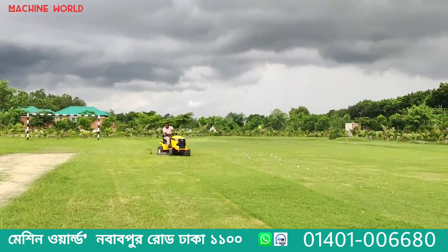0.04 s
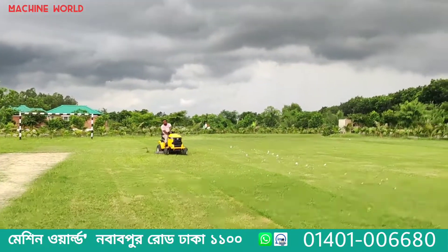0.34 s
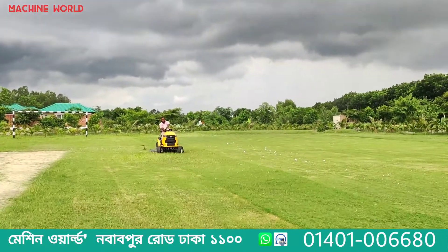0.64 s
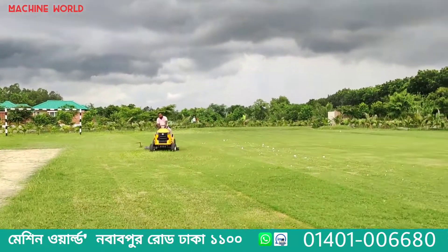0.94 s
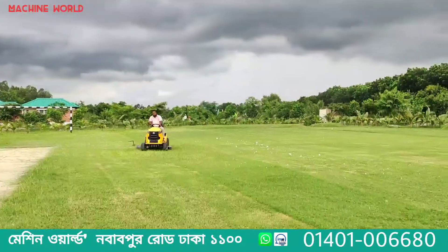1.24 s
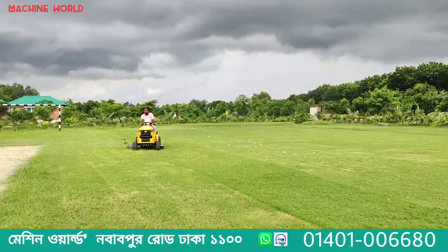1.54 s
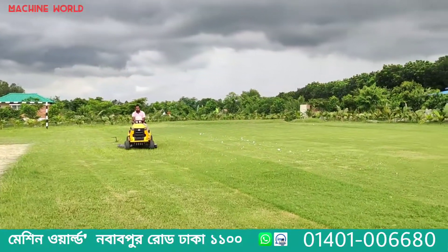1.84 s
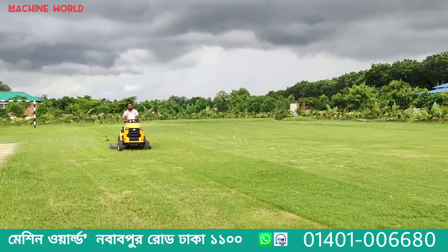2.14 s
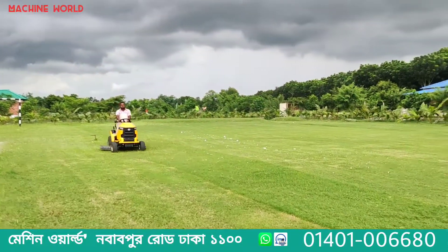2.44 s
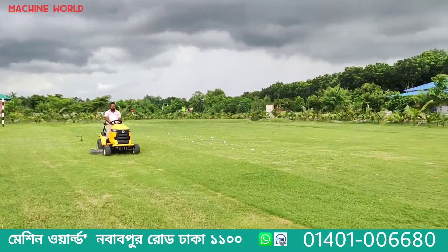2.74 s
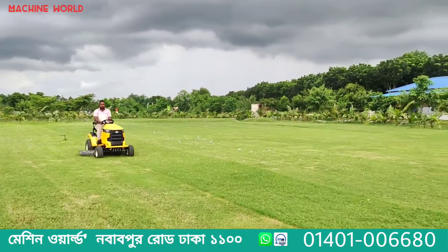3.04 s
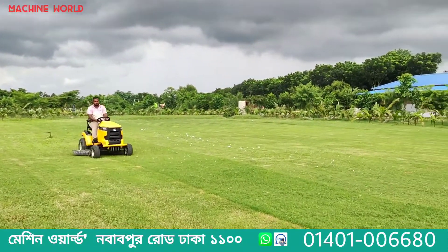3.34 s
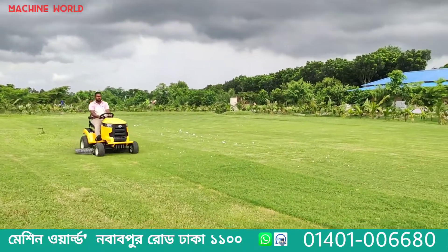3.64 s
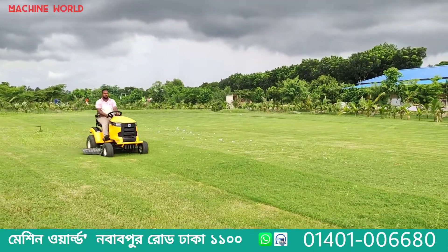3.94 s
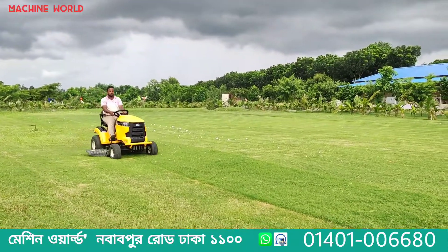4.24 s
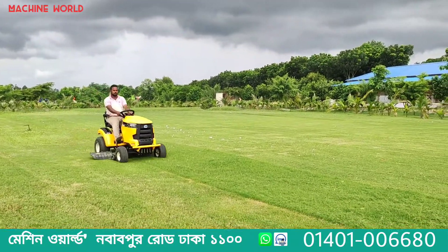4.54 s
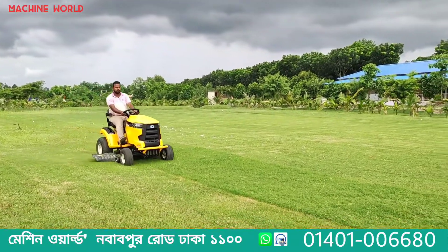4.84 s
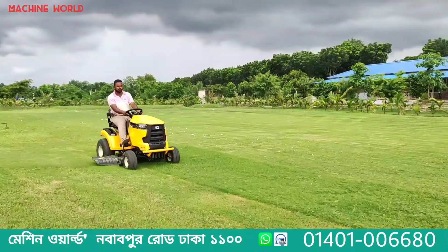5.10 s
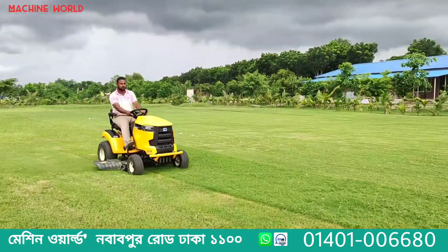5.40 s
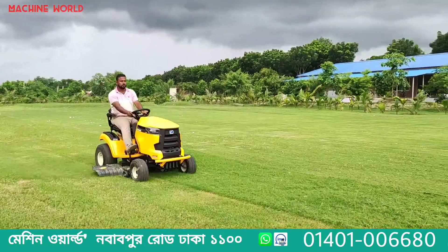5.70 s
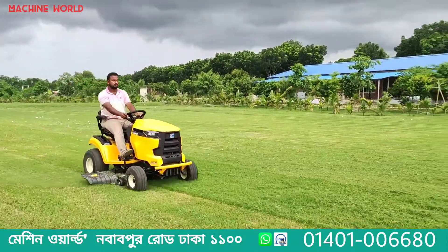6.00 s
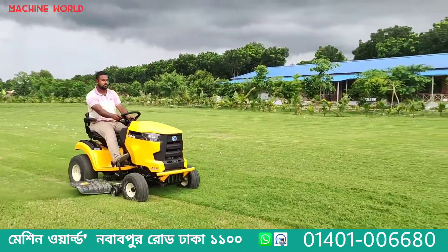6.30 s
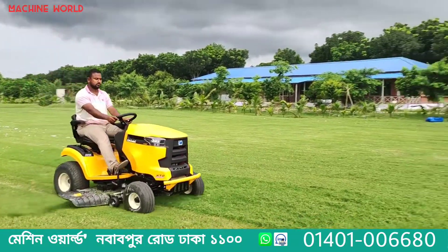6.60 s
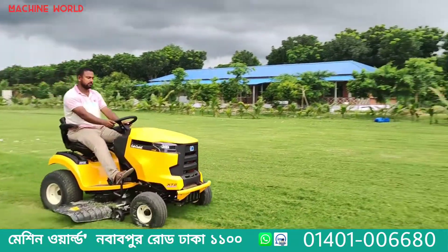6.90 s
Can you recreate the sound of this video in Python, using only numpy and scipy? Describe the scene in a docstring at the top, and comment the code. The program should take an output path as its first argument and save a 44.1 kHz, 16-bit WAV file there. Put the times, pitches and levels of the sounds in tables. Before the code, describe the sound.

Outdoors on a wide lawn, a ride-on mower approaches with an even, pulsing engine drone and fine mechanical ticking. The hum and airy rush of its blades and the hiss of cut grass swell as it nears, with one metallic tick midway. It ends close and loud, with rough gusts from the grass chute and several sharp cracks of grit. Faint wind touches the closely spaced microphones throughout.

```python
"""A petrol riding mower drones across an open lawn, growing louder as it comes close, cutting grass.
Its two-cylinder engine fires twice per cycle into a muffler, while valves tick and engine covers ring.
Belt-driven blades hum and rush in the deck (their steel housing), and cut grass hisses.
Near the end, grit cracks and the chute that throws out the cuttings roars.
A light breeze touches the two closely spaced microphones."""
import sys
import numpy as np
from scipy import signal
from scipy.io import wavfile
from scipy.ndimage import uniform_filter1d, map_coordinates

SR = 44100
rng = np.random.default_rng(int(sys.argv[2]) if len(sys.argv) > 2 else 0)


def int16_out(signal):
    """Quantize to a 16-bit WAV file."""
    q = np.round(np.clip(np.atleast_2d(signal).T, -1, 1) * 32767)
    wavfile.write(sys.argv[1], SR, q.astype(np.int16))


N = 311346
TIME = np.arange(N) / SR
FRAME = 1024  # samples in each short slice of sound that is filtered
BIN_HZ = np.maximum(np.arange(FRAME // 2 + 1) * SR / FRAME, 1)[:, None]

# the two firings in an engine cycle (two crank turns): place/cycles, strength
CYLINDER_FIRINGS = [(0.076, 0.81), (0.455, 0.97)]
# the bright sound of a tap on metal: f/Hz, relative level/dB
TICK_SPECTRUM = [(1200, 1), (2200, -17), (3150, -3), (4000, 6.5), (5900, 8.5), (7500, 1.5), (10000, -1.5),
                 (14000, -12)]


def exhaust(cycle, jitter_cycles=.0013, flutter=0.081, side_rise_db=6, puff_db=-10):
    """Each firing thumps through the muffler, barks in the air intake and blows a rough puff of gas."""
    # tones of the exhaust and of the intake: multiple of the cycle rate, relative level/dB
    exhaust_tones = [(2, -16.5), (3, -16), (5, -3), (6, -3), (7, -10.5), (8, 0), (9, -8.5), (10, -6),
                     (11, -16.5), (12, -15.5), (13, -10.5), (14, -15), (15, -17.5), (16, -18.5),
                     (26, -26.5)]
    intake_tones = [(18, -25.5), (19, -15), (20, -15), (21, -9.5)]
    # the puff of gas: f/Hz, relative level/dB
    puff_spectrum = [(30, -30), (100, 10), (170, 11.5), (260, 8), (340, 5), (450, -23), (700, -10),
                     (1500, -39)]
    shaken = cycle + jitter_cycles * drift(5.4)
    note, side = np.zeros(N), side_view()
    resonance, width = 11.2, .8  # where the muffler rings, in multiples of the cycle rate
    for order, level_db in exhaust_tones:
        waver = from_db(0.12 * order * drift(0.65))  # high tones shift most with the path over the grass
        above = np.arctan2(width, resonance - order) / np.pi  # 0 below the resonance, 1 above
        beam_db = side_rise_db * (side - .5) * above  # the higher tones leave sideways
        note -= from_db(level_db + beam_db) * waver * firing_tone(shaken, order, 2 * np.pi * above)
    for order, level_db in intake_tones:  # heard through the front grille
        note += from_db(level_db) * (1 - side) * (1 + 0.36 * drift(15.0)) * firing_tone(shaken, order)
    puffs = sum(strength * bursts(cycle, place - .12, length=.125, uneven_db=4)
                for place, strength in CYLINDER_FIRINGS)
    flow = rms_one(.16 + puffs)  # some gas keeps flowing between firings
    return note * (1 + flutter * drift(4.8)) + from_db(puff_db) * flow * noise(at_hz(puff_spectrum))


def firing_tone(cycle, order, lag_radians=0):
    """One tone at a multiple of the cycle rate, timed by the two unevenly spaced firings."""
    pair = sum(strength * np.exp(-2j * np.pi * order * place) for place, strength in CYLINDER_FIRINGS)
    return np.sqrt(2) * np.cos(2 * np.pi * order * cycle + np.angle(pair) - lag_radians)


def blade_hum(passes, waver=0.2):
    """Blade tips hum as they pass the deck wall; belt slip and grass load unsettle the higher tones."""
    # tones at 2, 4 and 5 times the blade-pass rate: t/s, second/dB, fourth/dB, fifth/dB
    harmonic_levels = [(.4, -24, -43, -44.5), (.8, -29, -42.5, -40.5), (1.7, -32.5, -42, -44),
                       (2.7, -34, -32.5, -56), (3.4, -34.5, -48, -46), (4.55, -23.5, -34, -33),
                       (5.1, -20.5, -30.5, -33.5), (5.75, -16.5, -23.5, -36), (6.2, -18.5, -24.5, -30.5),
                       (7.06, -19, -28.5, -28.5)]
    # tones that grow as the mower nears: multiple of the blade-pass rate, relative level/dB
    blade_overtones = [(3, -4), (6, -18.5), (7, -17.5), (8, -14.5), (9, -18), (10, -17.5), (22, -20)]
    # brief booms at 3 times the blade-pass rate: t/s, half length/s, level/dB
    booms = [(.59, 0.03, -28), (.72, 0.018, -24)]
    second_db, fourth_db, fifth_db = in_time(harmonic_levels)
    phase = 2 * np.pi * passes
    first = approach(-30, 6) * np.sin(phase)
    second = from_db(second_db) * (1 + 0.084 * drift(1.0)) * np.sin(2 * phase)
    overtones = np.zeros(N)
    for order, level_db in blade_overtones:
        angle = order * phase + 2 * np.pi * rng.random()
        tone = (1 + waver * drift(1.0)) * np.sin(angle) + waver * drift(1.4) * np.cos(angle)
        overtones += from_db(level_db) * tone
    third = swells(booms) * np.sin(3 * phase)
    drone = from_db(fourth_db) * np.sin(4 * phase) + from_db(fifth_db) * np.sin(5 * phase)
    drone *= 1 + waver * drift(2.5)
    forward = turning_away() * (first + approach(-31.5, 8.4) * overtones)
    return np.sqrt(2) * (second + third + drone + forward)


def deck_rush(passes, colour_db, chop=0.024, flicker_db=1.08):
    """Air is whipped round the deck and lightly chopped by the blades."""
    # the rush from the front and from the side: f/Hz, relative level/dB
    front_spectrum = [(40, -2), (100, 8), (300, 5), (490, 10.5), (680, 2), (920, -11.5), (1160, -1.5),
                      (1850, -9.5), (2350, -8.5), (2750, -1), (3150, -6), (3700, -4), (5000, -13),
                      (9000, -32)]
    side_spectrum = [(100, 3), (300, 13), (490, 3), (720, 8.5), (950, 4), (1200, 2), (1700, -1.5),
                     (2400, 4), (3100, 2), (3700, 0.5), (5000, -5.5), (9000, -13.5)]
    rush = noise(facing_spectrum(front_spectrum, side_spectrum), colour_db)
    return rush * (1 + chop * np.sin(2 * np.pi * passes)) * from_db(flicker_db * drift(13.6))


def grass_hiss(colour_db, tuft_db=1.23, treble_hz=9400):
    """Countless stems are cut and thrown: a smooth hiss that swells with each thicker tuft."""
    # the hiss: f/Hz, relative level/dB
    hiss_spectrum = [(1500, -20), (3500, 4), (4500, 5), (6200, 5.5), (7800, 1.5), (9000, 0.5), (10100, -4),
                     (11500, 2), (14500, -3)]
    # thicker grass hisses louder: t/s, gain/dB
    grass_load = [(0, 2), (1.3, 1), (2.1, 0), (2.7, 2.5), (3.6, 0.5), (4.2, -0.5), (5.1, 0.5), (5.9, -1.5),
                  (6.6, 1), (7.0, 0.5)]
    # the highest treble rises and falls: t/s, gain/dB
    top_treble = [(0, -1), (1.3, 2), (2.15, -1), (2.3, 1), (2.83, 2), (3.2, 2.5), (3.6, -2.5), (4.1, 2.5),
                  (5.2, 0.5), (6.0, -1.5), (6.8, -3.5), (7.06, -1)]
    top_db = in_time(top_treble, frame_times())[0] / (1 + (treble_hz / BIN_HZ) ** 12)
    hiss = filtered(noise(at_hz(hiss_spectrum), colour_db), from_db(top_db))
    return hiss * from_db(in_time(grass_load)[0] + tuft_db * drift(6.9))


def valve_ticks(cycle, colour_db):
    """Valves snap shut and pistons slap at the same places in every cycle."""
    # the ticks: place/cycles, relative level/dB
    ticks = [(.05, 4), (.4, -5.5), (.71, -7)]
    taps = sum(from_db(level_db) * bursts(cycle, place, length=.036, uneven_db=2.5)
               for place, level_db in ticks)
    return taps * noise(at_hz(TICK_SPECTRUM), colour_db)


def cover_ring(cycle, colour_db, wander=0.02, flurry_db=1.56):
    """Three knocks per cycle set the thin engine covers ringing in flurries, with wavering pitch."""
    # the pitches the covers ring at: f/Hz, width/Hz, relative level/dB
    cover_modes = [(2305, 99, -4.5), (2702, 63, 2), (3117, 170, 0.5)]
    # valve parts knock on the covers: place/cycles, relative level/dB
    knocks = [(.04, 0), (.38, -3), (.7, -2)]
    # loudness of the ringing: t/s, level/dB
    ring_level = [(0, -38), (.8, -35.8), (1.4, -37.8), (2.2, -40), (2.9, -33.8), (3.6, -38), (4.5, -35),
                  (4.88, -30), (5.3, -34), (7.06, -33.5)]
    power = 0
    for hz, width_hz, level_db in cover_modes:
        centre_hz = hz * (1 + wander * np.interp(frame_times(), TIME, drift(2.1)))
        power = power + (from_db(level_db) / (1 + ((BIN_HZ - centre_hz) / width_hz) ** 2)) ** 2
    knocking = sum(from_db(level_db) * bursts(cycle, place, length=.075, uneven_db=2.0)
                   for place, level_db in knocks)
    flurries = rms_one(knocking * from_db(flurry_db * drift(6.3)))
    return from_db(in_time(ring_level)[0]) * noise(10 * np.log10(power), colour_db / 2, drive=flurries)


def chute_roar(passes, faces_listener_s=7.24, surge_db=3.0, growl=0.29):
    """Air roars from the chute and surges with each clump of grass; the blades chop it into a growl."""
    # the roar: f/Hz, relative level/dB
    roar_spectrum = [(550, -26), (720, 2.5), (870, 1.5), (1020, 0), (1300, -31), (1780, -2), (2100, -12),
                     (3000, -21)]
    # thick clumps going through: t/s, half length/s, level/dB
    clumps = [(6.3, 0.034, -28), (6.385, .035, -22.5), (6.5, 0.017, -24), (6.57, 0.016, -24),
              (6.85, .02, -28), (6.935, 0.019, -21)]
    aim_db = -30.5 - 3.5 * np.abs(TIME - faces_listener_s)  # louder as the chute swings towards us
    flow = np.hypot(from_db(aim_db + surge_db * drift(25)), swells(clumps))
    return flow * (1 + growl * np.sin(2 * np.pi * passes)) * noise(at_hz(roar_spectrum))


def drive_whine(cycle):
    """The drive sings thin, unsteady tones that follow the engine's speed."""
    # the tones: multiple of the cycle rate, relative level/dB
    whine_tones = [(135, -16), (211, -17)]
    whine = np.zeros(N)
    for order, level_db in whine_tones:
        strength = from_db(level_db) * (1 + .5 * drift(13.0))
        whine += strength * np.sin(2 * np.pi * order * cycle + 1.7 * drift(5.0))
    return whine


def metallic_clicks(decay_s=0.011):
    """Sharp metallic clicks: one loud valve tick midway, then grit cracking near the end."""
    # the clicks: t/s, peak level/dB
    clicks = [(3.6424, -26), (6.4924, -21), (6.8818, -19), (6.9247, -20), (6.969, -16)]
    loudness = sum(from_db(peak_db) * (TIME >= s) * np.exp(-np.abs(TIME - s) / decay_s)
                   for s, peak_db in clicks)
    return loudness * noise(at_hz(TICK_SPECTRUM))


def breeze(shared_db=-56.0, own_db=-45.0, gust_db=1.5):
    """Moving air rumbles softly: part reaches both microphones, part swirls at each one alone."""
    # the rumble: f/Hz, relative level/dB
    breeze_spectrum = [(40, -15), (80, 11), (200, -1), (600, -43)]
    rumble_db = at_hz(breeze_spectrum)
    shared = noise(rumble_db)
    swirls = np.array([noise(rumble_db)[0], noise(rumble_db)[1]])
    return (from_db(shared_db) * shared + from_db(own_db) * swirls) * from_db(gust_db * drift(3.1))


def deck_colour(echo_s=0.001473, spread=0.012, ripple_db=1.5):
    """The deck's ringing and inner echo boost some pitches and weaken others: dB for each microphone."""
    # the deck's peaks and dips, heard from the side: f/Hz, width/Hz, gain/dB
    deck_peaks = [(477, 35, -5.5), (944, 61, 2.5), (1114, 59, -6), (1635, 93, 5), (2340, 110, 3),
                  (2615, 82, -4), (2980, 200, 0.5), (3434, 110, -5.5), (4220, 88, -13.5), (5100, 73, -5.5),
                  (6060, 400, 0.5), (7900, 180, -5)]
    # they slide up as the mower turns and nears, and soften close by: t/s, pitch factor, depth factor
    deck_sweep = [(0, 0.63, 0.26), (2.3, 0.73, 0.24), (2.9, .82, 0.65), (3.65, 0.91, 0.98),
                  (4.05, 0.97, 1.3), (4.55, 0.98, 1.3), (5.7, 1.004, 1.1), (6.3, 1.04, 0.76),
                  (7.06, 1.07, 0.76)]
    shift, depth = in_time(deck_sweep, frame_times())
    deck_hz = np.array([BIN_HZ / (shift * (1 + sign * spread)) for sign in (1, -1)])  # left peaks higher
    peaks_db = sum(gain_db * np.exp(-((deck_hz - hz) / width_hz) ** 2 / 2)
                   for hz, width_hz, gain_db in deck_peaks)
    echo_db = -1.4 * np.cos(2 * np.pi * echo_s * deck_hz)
    modes = rng.standard_normal(len(BIN_HZ))  # many small resonances of the steel panels
    ripple = rms_one(uniform_filter1d(modes, size=2) - uniform_filter1d(modes, size=7))[:, None]
    panels_db = ripple_db * ripple / (1 + (BIN_HZ / 10000) ** 4)
    return depth * peaks_db + (BIN_HZ > 1200) * (depth * echo_db + panels_db)


def sliding_dips(x):
    """Two narrow bands of pitch are weakened: one sinks through the treble, the other rises."""
    # a narrow treble dip that slides from 6 to 4 kHz and fades: t/s, f/Hz, gain/dB
    sinking_treble_dip = [(0, 5950, -12), (1.15, 6180, -10), (1.6, 5750, -4), (1.9, 4740, -1.5),
                          (2.4, 4470, -3), (3.0, 4320, -4), (4.0, 4070, -0.5), (5.0, 4050, 0)]
    # two paths round the deck cancel a band that rises as the mower turns: t/s, f/Hz, gain/dB
    deck_dip = [(2.2, 1590, -0.5), (2.9, 1740, -9), (3.3, 1780, -9), (3.65, 1770, -26), (4.2, 1970, -11),
                (4.65, 2060, -9), (5.75, 2070, -14), (6.3, 2120, -7), (7.06, 2110, -2)]
    gain_db = 0
    for rows, width in ((sinking_treble_dip, 0.067), (deck_dip, 0.031)):  # width as a share of frequency
        hz, depth_db = in_time(rows, frame_times())
        gain_db = gain_db + depth_db * np.exp(-(np.log(BIN_HZ / hz) / width) ** 2 / 2)
    return filtered(x, from_db(gain_db))


def microphones(x, shadow_hz=700):
    """Their case shades each microphone by direction, and the left one hears the mower slightly later."""
    # balance with the mower's front or side in view: f/Hz, left minus right/dB
    front_balance = [(2000, -1), (4000, 3.5), (6300, 2), (7100, 4), (7800, -30), (8700, 9), (10000, 3),
                     (12000, 16), (14500, 4)]
    side_balance = [(900, 0.5), (2800, -1.5), (4200, 2), (6000, 1), (7500, -9.5), (9200, 1.5), (12000, -1),
                    (14500, 5)]
    # the case's resonances shift left against right: f/Hz, width/Hz, phase/radians
    case_bends = [(2530, 480, 1), (4500, 300, 0.53)]
    # the left microphone's delay, set by the mower's direction: t/s, delay/ms
    left_delay = [(0, 0.081), (1.3, 0.081), (2.0, 0.099), (2.8, 0.11), (3.5, 0.15), (4.7, 0.094),
                  (6.4, 0.072), (7.06, .12)]
    balance_db = facing_spectrum(front_balance, side_balance)
    balance_db *= BIN_HZ ** 2 / (BIN_HZ ** 2 + shadow_hz ** 2)  # long waves bend round the case
    shade = from_db(np.array([balance_db, -balance_db]) / 2)
    shade /= np.sqrt(np.mean(shade ** 2, axis=0))
    bend = sum(radians * np.exp(-((BIN_HZ - hz) / width_hz) ** 2 / 2)
               for hz, width_hz, radians in case_bends)
    turn = np.exp(1j * side_view(frame_times()) * bend / 2)
    left, right = filtered(x, shade * np.array([turn, 1 / turn]))
    lag_samples = in_time(left_delay)[0] * SR / 1000
    return np.array([map_coordinates(left, [np.arange(N) - lag_samples], order=3, mode="nearest"), right])


def approach(db_at_10_m, db_per_halving):
    """Gain of a source that grows louder each time the mower's distance halves."""
    # the mower's way in: t/s, distance/m
    distance = [(0, 20.6), (2.15, 14.2), (2.85, 10.2), (3.4, 10.3), (5.7, 5.18), (7.06, 4)]
    halvings = np.log2(10 / in_time(distance)[0])
    return from_db(db_at_10_m + db_per_halving * halvings)


def turning_away(alongside_s=5.7, fade_db_per_s=2.5):
    """Gain of sound sent forwards: full until the mower draws alongside, then fading."""
    return from_db(-fade_db_per_s * np.maximum(TIME - alongside_s, 0))


def side_view(t=TIME):
    """How much of the mower's side faces the listener."""
    # the mower's turn: t/s, share (0 head-on, 1 side-on)
    side_share = [(0, 0.4), (2.0, 0.25), (4.25, 0.81), (7.06, 0.88)]
    return in_time(side_share, t)[0]


def facing_spectrum(front_points, side_points):
    """Blends a front and a side spectrum as the mower turns."""
    side = side_view(frame_times())
    return (1 - side) * at_hz(front_points) + side * at_hz(side_points)


def noise(spectrum_db, colour_db=0, drive=1):
    """Stereo noise, pulsed by drive: a direct part both sides share, and a scattered part they do not."""
    # how alike the two microphones sound: f/Hz, shared part of the power (0-1)
    likeness = [(280, .95), (500, .96), (900, .9), (1400, .72), (2500, .77), (4000, .56), (6200, .55),
                (8000, .35), (14000, .28)]
    gain, alike = from_db(spectrum_db), at_hz(likeness)
    direct = gain * np.sqrt(alike) * from_db(colour_db)
    scattered = gain * np.sqrt(1 - alike) * from_db(.95 * colour_db)  # keeps a little less colour
    size = np.sqrt(np.mean(direct ** 2 + scattered ** 2, axis=-2, keepdims=True))
    shared = filtered(drive * rng.standard_normal(N), direct / size)
    return shared + filtered(drive * rng.standard_normal((2, N)), scattered / size)


def bursts(cycle, place, length, uneven_db):
    """One quick rise and slower fall per cycle, each of random strength; place and length in cycles."""
    count, age = np.divmod(cycle - place + 2, 1)
    strength = from_db(uneven_db * (2 * rng.random(size=256) - 4.0))[count.astype(int)]
    return strength * age / length * np.exp(1 - age / length)


def swells(rows):
    """A bell-shaped rise and fall of gain for each row."""
    return sum(from_db(level_db) * np.exp(-((TIME - s) / half_s) ** 2 / 2) for s, half_s, level_db in rows)


def drift(rate_hz):
    """A smooth random wobble, typically of size 1."""
    pole = np.exp(-80 * np.pi * rate_hz / SR)
    steps = rng.standard_normal(N // 40 + 2002)  # one for every 40 samples, plus time to settle
    slow = signal.lfilter([1], [1, -2 * pole, pole * pole], steps)[2000:]
    return np.interp(np.arange(N) / 40, np.arange(len(slow)), rms_one(slow))


def filtered(x, gain):
    """A filter whose gain may change from frame to frame."""
    frames = signal.stft(x, nperseg=FRAME)[2]
    return signal.istft(frames * gain, nperseg=FRAME)[1][..., :N]


def frame_times():
    return np.arange(int(np.ceil(2 * N / FRAME)) + 1) * FRAME / 2 / SR


def in_time(rows, t=TIME):
    """Each column of a timed table, read at the times t."""
    seconds, *columns = np.transpose(rows)
    return [np.interp(t, seconds, column) for column in columns]


def at_hz(points):
    """A spectrum read at every frequency in BIN_HZ."""
    hz, value = np.transpose(points)
    return np.interp(np.log(BIN_HZ), np.log(hz), value)


def from_db(db):
    return 10 ** (np.asarray(db) / 20)


def rms_one(x):
    return x / np.sqrt(np.mean(x ** 2) + 1e-20)


def scene():
    """Engine speed drives every rhythm; distance and view set the loudness and the tone colour."""
    # the speed wanders a little as the engine's governor holds it: t/s, cycle rate/Hz
    engine_speed = [(0.0, 24.124), (0.7, 23.259), (0.98, 23.353), (1.26, 23.829), (1.57, 23.793),
                    (2.17, 23.183), (2.78, 23.902), (3.14, 23.659), (3.65, 23.956), (4.05, 23.43),
                    (4.85, 23.323), (5.04, 23.603), (5.44, 23.504), (6.15, 23.605), (6.74, 22.985),
                    (7.06, 23.257)]
    cycle = np.cumsum(in_time(engine_speed)[0]) / SR
    passes = 3.4197 * cycle  # blade passes so far
    colour_db = deck_colour()
    engine = approach(-26, 4.2) * exhaust(cycle) + approach(-25.5, 5.3) * valve_ticks(cycle, colour_db)
    deck = blade_hum(passes) + approach(-27, 5.5) * (deck_rush(passes, colour_db) + drive_whine(cycle))
    deck += chute_roar(passes)
    cuttings = approach(-33, 7.27) * grass_hiss(colour_db)
    mower = turning_away() * engine + metallic_clicks() + cover_ring(cycle, colour_db) + deck + cuttings
    return microphones(sliding_dips(mower)) + breeze()


def record(dry):
    """The highest peaks are rounded and the top treble is cut steeply."""
    ceiling, cutoff_hz = .96, 14400
    rounded = dry / (1 + (dry / ceiling) ** 8) ** (1 / 8)
    return signal.sosfiltfilt(signal.ellip(10, .05, 60, cutoff_hz, fs=SR, output="sos"), rounded)


dry = scene()
out = record(dry)
int16_out(out)
```